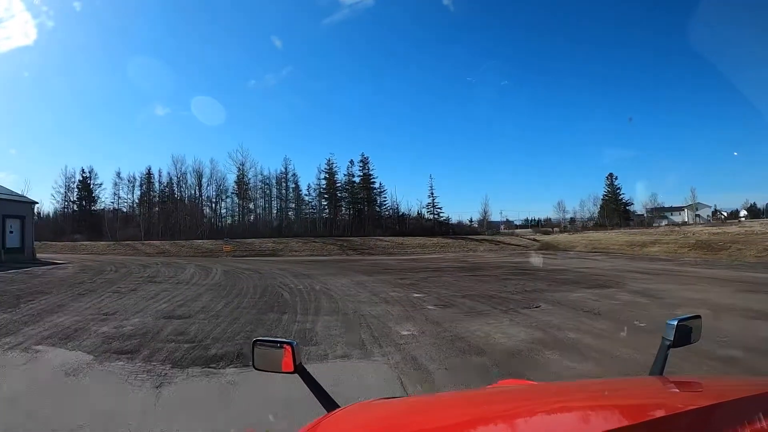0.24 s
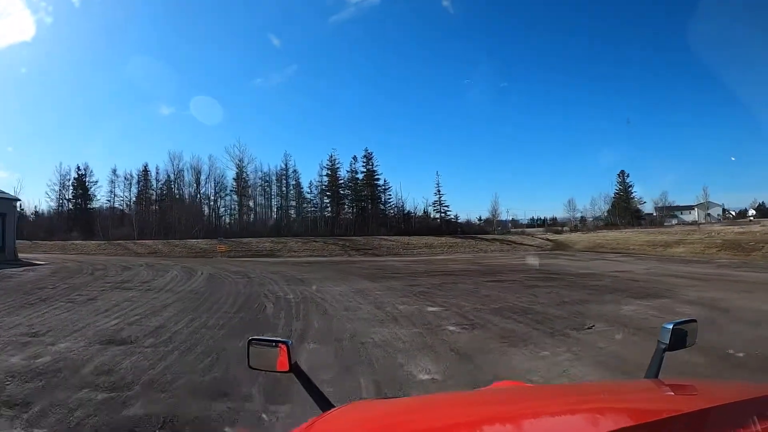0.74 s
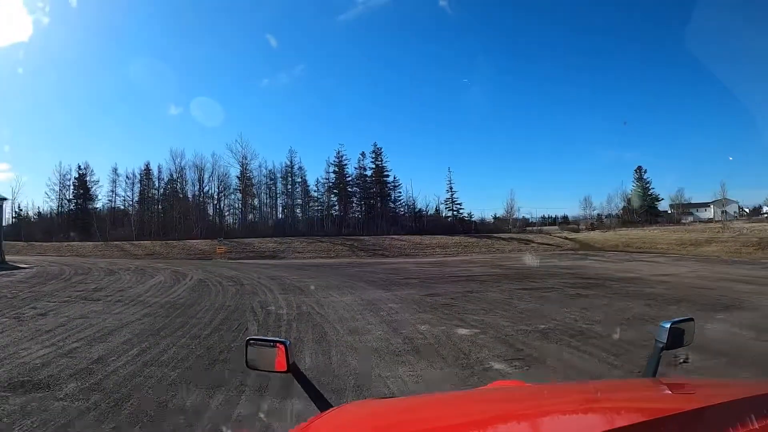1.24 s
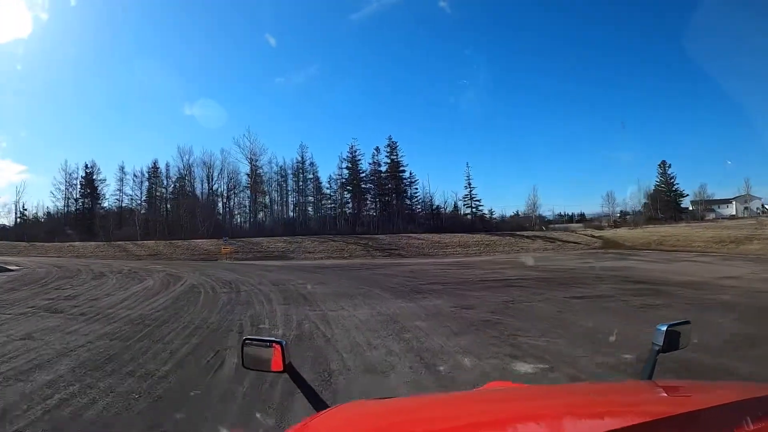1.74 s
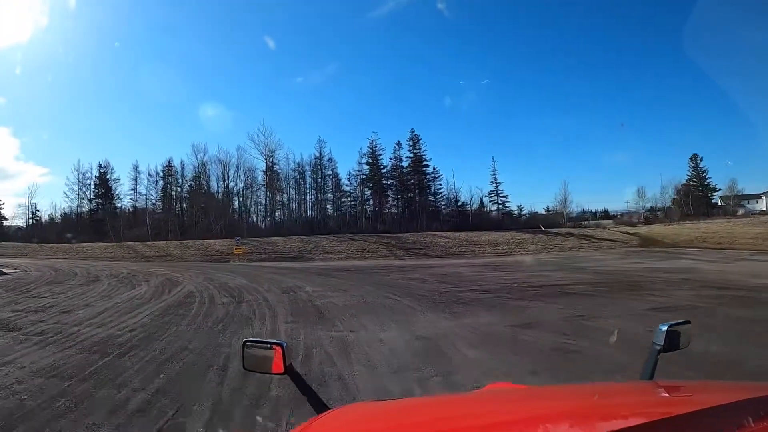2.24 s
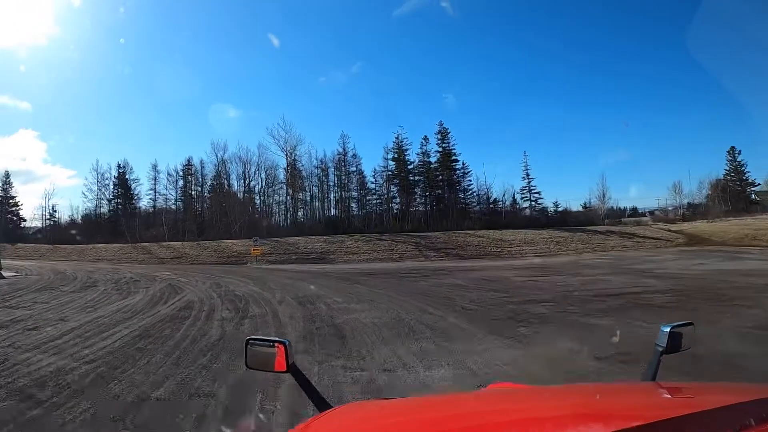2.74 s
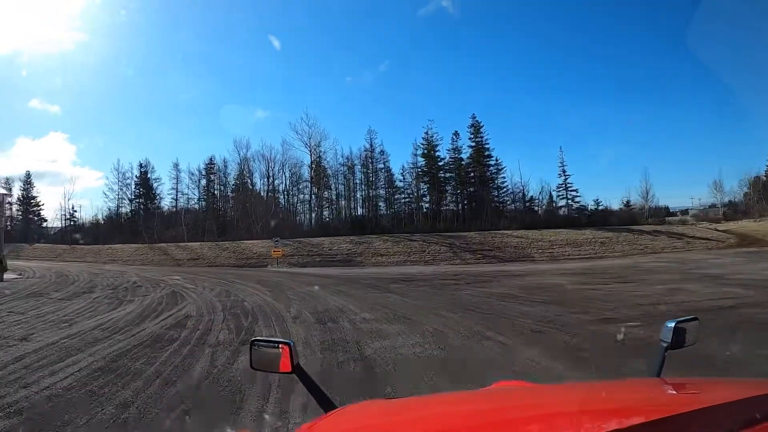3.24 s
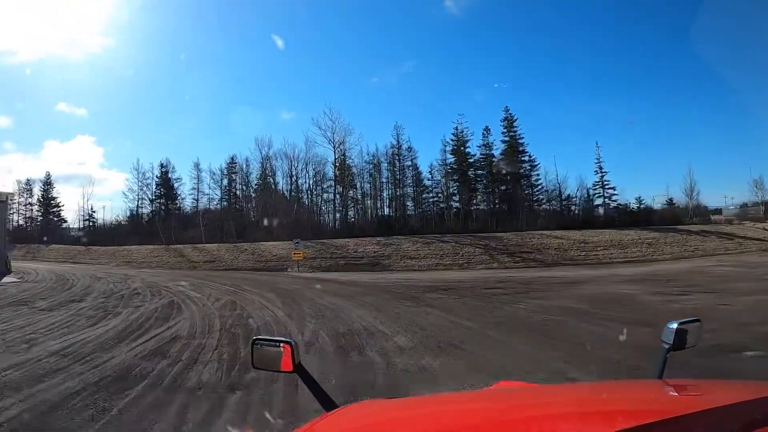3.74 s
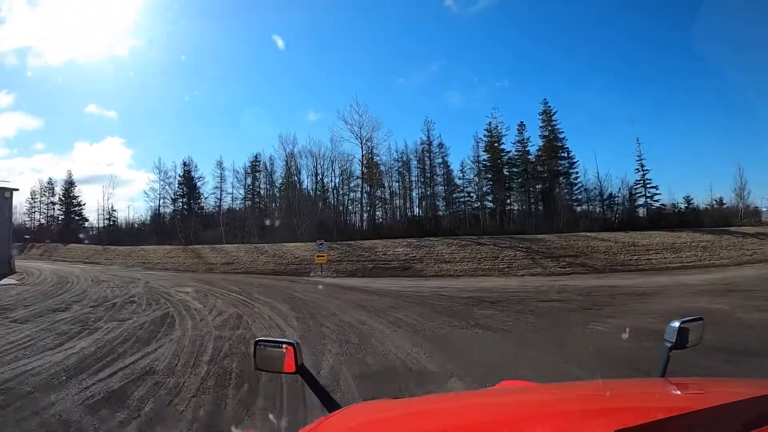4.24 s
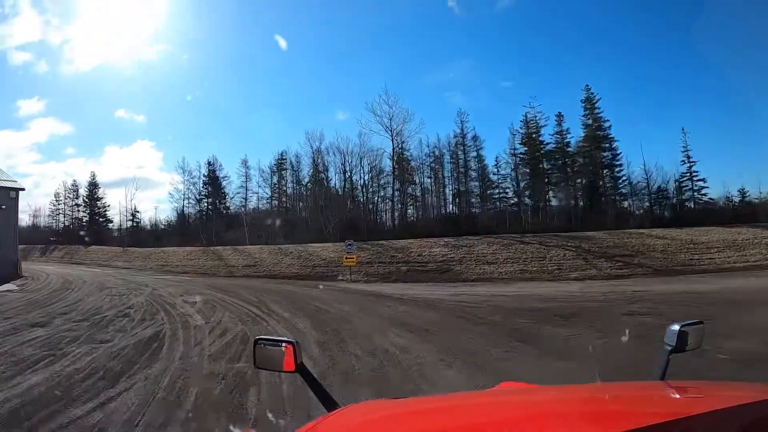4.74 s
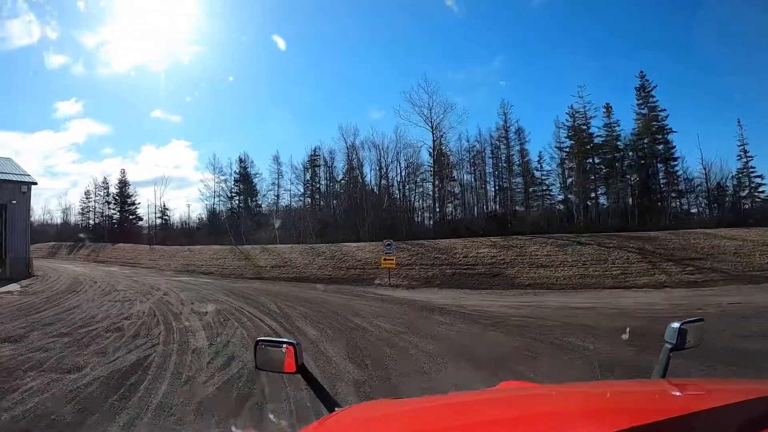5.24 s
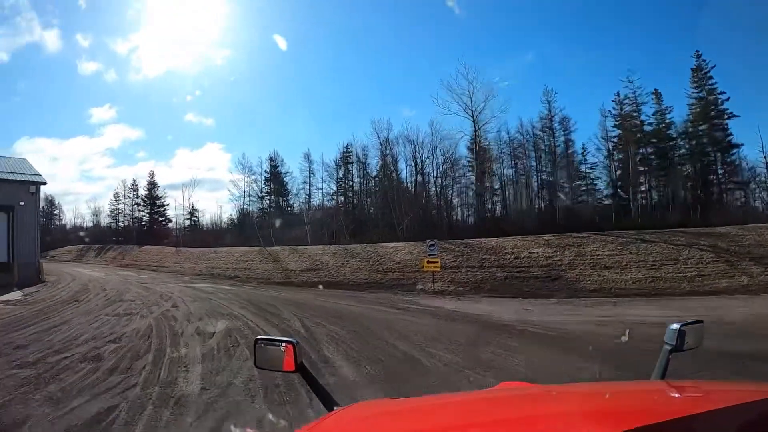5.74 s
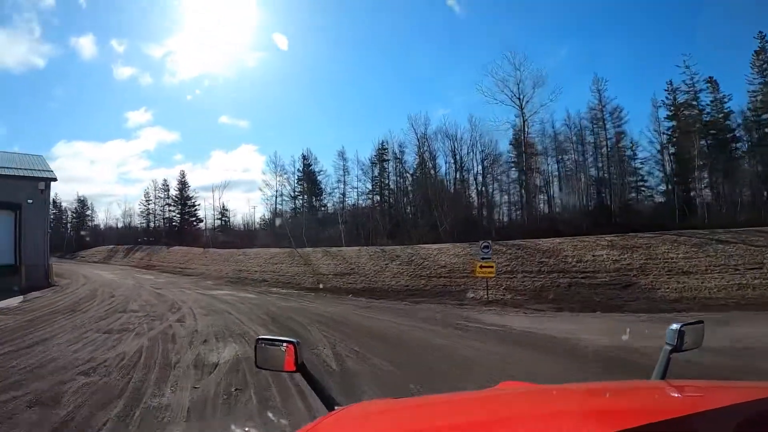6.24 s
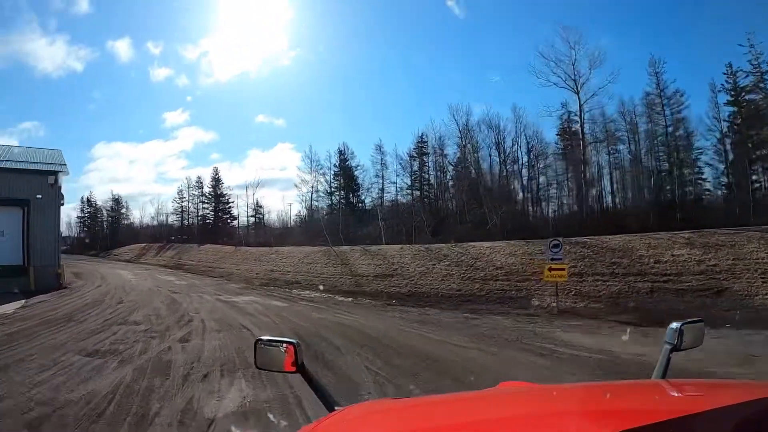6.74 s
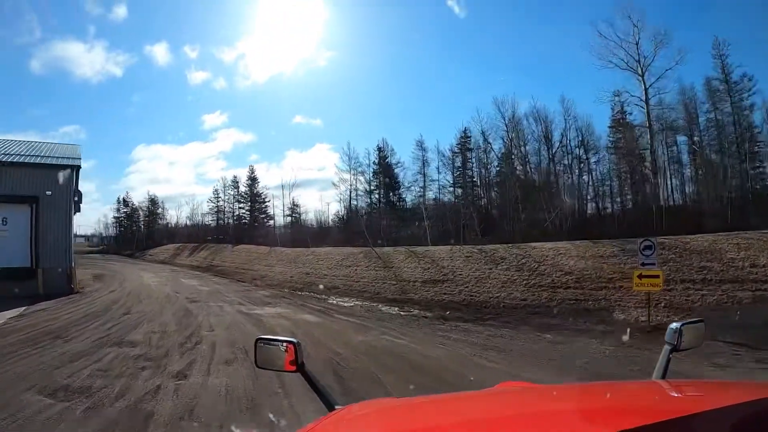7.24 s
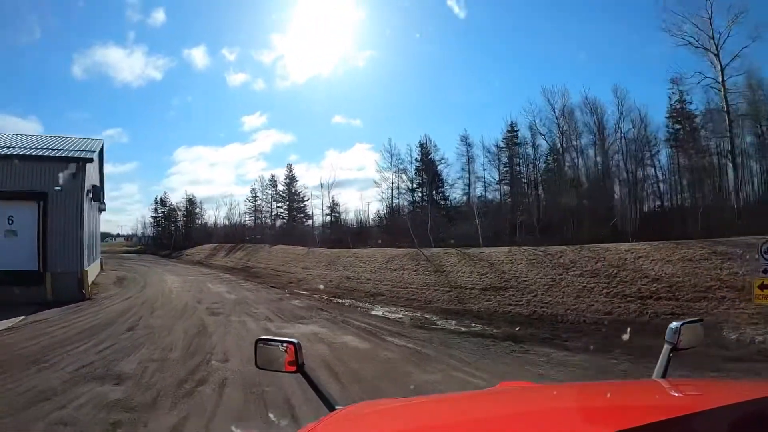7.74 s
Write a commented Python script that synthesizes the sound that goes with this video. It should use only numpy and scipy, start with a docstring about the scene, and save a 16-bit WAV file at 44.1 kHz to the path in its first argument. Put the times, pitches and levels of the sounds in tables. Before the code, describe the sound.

A stereo microphone inside a truck cab picks up a deep diesel drone, slowly falling, with faint whines and booms that swell and fade. Rough ground makes the frame shudder and thud. Plastic panels buzz in gusts and knock irregularly, with crisp cracks, ticks and light clinks. The busiest clatter comes in the first half, then bumps become sparser and the rumble eases while the engine keeps droning.

```python
"""A heavy diesel truck heard from inside its cab, rolling slowly over a dirt yard as the engine speed sinks.
Engine orders drone as sines on falling pitch curves, over a road bed of three shaped noises.
Bumps thud as short pushes into ringing frame modes. Loose trim buzzes in gusts as random contacts,
and knocks, snaps, ticks and clinks as short chatters that ring plastic and hard-part modes."""
import sys
import numpy as np
from scipy import signal
from scipy.fft import rfft, irfft
from scipy.io import wavfile
from scipy.ndimage import uniform_filter1d, minimum_filter1d

SR = 44100
rng = np.random.default_rng(int(sys.argv[2]) if len(sys.argv) > 2 else 0)


def to_wav(s):
    """Save 16-bit WAV."""
    ch = np.atleast_2d(s).T  # columns
    pcm = np.round(np.clip(ch, -1, 1) * 32767)  # PCM
    wavfile.write(sys.argv[1], SR, pcm.astype(np.int16))


N = 352800

# Engine speed and firing tone: (time [s], half the firing rate [Hz], level of the firing tone [dB])
ENGINE_CURVE = [(0, 30.42, -55), (.5, 30.25, -27), (1.1, 30.02, -47), (1.5, 29.03, -27), (2, 28.46, -28.5),
                (2.5, 27.58, -32.5), (2.9, 27.03, -25), (3.6, 26.68, -26), (4.3, 26.47, -24),
                (4.7, 26, -18.5), (5.3, 26.06, -23.5), (5.8, 25.85, -18), (6.3, 25.59, -22.5),
                (7, 25.29, -18), (7.5, 25.14, -21), (8, 24.85, -18)]
# Trim blows, levels ahead of the layer gains: (time [s], knock [dB], crack [dB], tick [dB], knock pitch [Hz])
TRIM_HITS = [(0.068, -31, -67.5, -81, 1160), (0.351, -30.5, -53, -45, 1160), (0.449, -32, -52, -42, 1340),
             (0.549, -44, -53.5, -58, 1110), (0.803, -30.5, -49, -67, 1260), (0.925, -29.5, -45, -49, 1150),
             (0.9596, -30, -42, -50, 1000), (1.4628, -27, -42, -42, 1230), (1.6485, -24.5, -48, -71, 1080),
             (1.8285, -29, -40.5, -47, 1189), (1.95, -49, -50.5, -53, 1140), (1.972, -46, -48, -48, 1140),
             (2.001, -36, -42.5, -44.5, 1090), (2.4, -39, -47.5, -61, 1900), (2.5068, -31, -56, -69, 1030),
             (2.55, -30.5, -56, -63, 1260), (2.613, -29, -56, -65, 1417), (2.666, -29, -62, -73, 1530),
             (2.715, -30, -46, -59, 1050), (2.748, -27, -50, -51, 1000), (2.7905, -31.5, -48, -60, 1020),
             (2.836, -46, -56, -60, 1900), (2.881, -31, -45.5, -56, 1200), (2.926, -27, -52, -58, 1270),
             (2.938, -23, -37, -43.5, 2000), (2.948, -21.5, -33, -40.5, 1254),
             (2.986, -24.5, -49, -54, 1300), (3.006, -25, -63, -66, 1280), (3.014, -22.5, -61, -66, 1920),
             (3.054, -50, -45, -59, 1060), (3.286, -30, -52, -64, 1230), (3.312, -37, -47, -59, 1020),
             (3.3845, -40, -45, -53, 1010), (3.409, -28, -43.5, -64, 1440), (3.458, -28, -40.5, -51, 1172),
             (3.49, -38, -47, -52, 1920), (3.565, -37, -47, -62, 1160), (3.653, -50, -45.5, -67, 1189),
             (3.748, -43, -51, -51, 1120), (3.856, -37, -42, -58, 1210), (3.887, -45, -53, -55, 1219),
             (4.064, -40, -44.5, -54, 1090), (4.1, -32, -46.5, -54, 1010), (4.157, -34, -39.5, -54, 1190),
             (4.228, -28, -46, -70, 1300), (4.324, -33, -49, -68, 1030), (4.387, -34, -48.5, -51, 1101),
             (4.524, -40, -48, -51.5, 1090), (4.59, -34, -70, -68, 1350), (4.76, -32, -62, -72, 1343),
             (4.811, -44, -52, -55.5, 1380), (5.003, -34, -51, -82, 1250), (5.073, -27.5, -47.5, -71, 1290),
             (5.216, -26, -42, -66, 1460), (5.377, -32.5, -50.5, -68, 1190),
             (5.425, -50, -46.5, -52.5, 1240), (5.875, -41, -45.5, -54, 1042),
             (5.9458, -32, -53, -63, 1930), (6.043, -36, -45.5, -61, 2050), (6.143, -37, -45, -60, 1125),
             (6.179, -35, -46, -66, 1197), (6.342, -38, -44, -52, 1030), (6.433, -33.5, -50, -76, 1310),
             (6.481, -34, -47.5, -54, 1091), (6.6593, -36, -49, -57, 1491), (6.788, -31.5, -52, -76, 1240),
             (7.22, -35, -54, -80, 1420), (7.283, -30.5, -55, -72, 1190), (7.3, -31, -42.5, -57, 1150),
             (7.42, -40, -47, -68, 1900), (7.49, -46, -50.5, -61, 1900), (7.602, -30.5, -49, -76, 1260),
             (7.634, -36, -52.5, -53, 1111), (7.757, -46, -58, -66, 1900), (7.914, -34, -55, -67, 1356)]
# Low modes of the plastic trim: (pitch [Hz], relative level [dB], 60 dB decay [s])
TRIM_MODES = [(630, -3, .035), (1000, -4, .025), (1150, -4, .028), (1285, -1, .03), (1420, -2, .035),
              (1630, -3, .035), (1925, 0, .03), (2200, -3, .03), (2450, -4, .03)]
# High modes of small hard parts: (pitch [Hz], relative level [dB], 60 dB decay [s])
HARD_MODES = [(2800, 0, .02), (3230, 0, .028), (3570, 0, .025), (3890, -1, .022), (4200, -2, .016),
              (4650, -2, .016), (5200, -3, .014), (5550, -5, .014), (5900, -4, .018), (6400, -6, .012),
              (6950, -3, .016), (8500, -9, .016)]
# Spectrum of a dry crack: (frequency [Hz], relative density [dB])
CRACK_SPECTRUM = [(1200, -27.5), (2200, 3), (3300, 6), (4000, -1), (5000, -9.5), (7000, -40.5)]
# Spectrum of a bright tick: (frequency [Hz], relative density [dB])
TICK_SPECTRUM = [(3000, -29), (4800, -1), (6000, -7), (7300, -7.5), (8500, -11), (10000, -11),
                 (12000, -37.5), (14000, -58)]


def from_db(db):
    """Decibels to gain."""
    return 10 ** (np.asarray(db) / 20)


def rms_one(x):
    """Scale to rms 1."""
    return x / np.sqrt(np.mean(x ** 2) + 1e-20)


def in_time(rows):
    """Columns of a curve, one value per sample."""
    s, *columns = np.transpose(rows)
    return [np.interp(np.arange(N) / SR, s, c) for c in columns]


def at_hz(points, hz):
    """Read a spectrum on a log-frequency axis."""
    point_hz, value = np.transpose(points)
    return np.interp(np.log(hz), np.log(point_hz), value)


def drift(rate_hz):
    """Slow random wander of rms 1: noise through a double low-pass, made at every 40th sample."""
    r = np.exp(-80 * np.pi * rate_hz / SR)
    noise = rng.standard_normal(N // 40 + 2002)
    slow = rms_one(signal.lfilter([1], [1, -2 * r, r * r], noise)[2000:])
    return np.interp(np.arange(N) / 40, np.arange(len(slow)), slow)


def ring(clicks, hz, t60):
    """Two-pole resonator: a unit click sets a dying sine of height 1 ringing."""
    r, w = from_db(-60 / (t60 * SR)), 2 * np.pi * hz / SR
    return signal.lfilter([0, np.sin(w)], [1, -2 * r * np.cos(w), r * r], clicks + 1e-18)


def tone(hz, level_db):
    """A sine of given rms level that follows a pitch curve."""
    turns = np.cumsum(hz) / SR + rng.random()
    return np.sqrt(2) * from_db(level_db) * np.sin(2 * np.pi * turns)


def band(x, low_hz, high_hz):
    """Soft band-pass."""
    return signal.sosfilt(signal.butter(2, [low_hz, high_hz], "band", fs=SR, output="sos"), x)


def colour(spectrum, mid, side):
    """Two sources become a stereo pair with this spectrum and the cab's likeness per frequency; rms 1."""
    # Likeness of left and right in the cab: (frequency [Hz], likeness [0 to 1])
    likeness = [(60, 1.0), (150, 0.97), (370, 0.97), (920, 0.85), (2280, 0.73), (5660, 0.042),
                (14000, 0.17)]
    hz = np.maximum(np.fft.rfftfreq(N, 1 / SR), 1)
    gain = from_db(at_hz(spectrum, hz))
    alike = np.clip(at_hz(likeness, hz), 0, 1)
    mid = rfft(mid) * gain * np.sqrt(1 + alike)
    side = rfft(side) * gain * np.sqrt(1 - alike)
    return rms_one(irfft([mid + side, mid - side], N))


def engine():
    """The pitched layers: engine orders, booms, whines and the hum of the cab."""
    return strong_orders() + booms_and_whines() + cycle_orders() + mount_hum() + faint_whines()


def strong_orders():
    """The firing tone, and four higher orders as loud as the cab lets through at their pitch."""
    # Cab gain for the higher orders: (pitch [Hz], mean level [dB])
    cab_gain = [(72, -40), (76, -45), (82, -33.5), (87, -35.5), (89.5, -26), (93, -21.5), (99, -24),
                (103, -25.5), (108.5, -27), (113, -45.5), (119, -31.5), (123, -39.5), (132, -34.5),
                (142, -33.5), (149, -39), (154, -42.5), (165, -48.5), (179, -53), (183, -32.5)]
    half_firing_hz, firing_db = in_time(ENGINE_CURVE)
    out = tone(2 * half_firing_hz, firing_db)
    for multiple in (3, 4, 5, 6):
        hz = multiple * half_firing_hz
        waver_db = 1.94 * drift(1.5)
        out += tone(hz, at_hz(cab_gain, hz) + waver_db)
    return out


def booms_and_whines():
    """Booms near 280 Hz and whines near 730 and 910 Hz swell and fade on sinking pitches; all waver as one."""
    # Booms, one table a swell: (time [s], pitch [Hz], mean level [dB])
    booms = [
        [(0, 284, -48), (.35, 282, -41), (.65, 279, -50), (.9, 278, -36), (1.2, 275, -36), (1.5, 269, -41),
         (1.9, 265, -50), (2.1, 263, -60)],
        [(2.1, 283, -60), (2.5, 282, -44), (3, 278, -49), (3.8, 272, -46), (4.5, 268, -52), (4.7, 266, -65)],
        [(4.7, 285, -65), (5, 284, -48), (6, 283, -50), (7, 279, -47), (8, 275, -50)],
    ]
    # Whines, one table a swell: (time [s], pitch [Hz], mean level [dB])
    swelling_whines = [
        [(0, 730, -53), (.4, 728, -57), (.6, 725, -75)],
        [(0, 914, -56), (.7, 908, -56), (1.3, 898, -72)],
        [(.6, 742, -75), (.85, 737, -53), (1.15, 729, -51), (1.4, 716, -53), (1.7, 708, -75)],
        [(2.4, 742, -75), (2.7, 735, -55), (3.2, 727, -54), (3.6, 719, -57), (4.4, 712, -59), (4.8, 708, -75)],
    ]
    return from_db(drift(1.7)) * sum(tone(*in_time(rows)) for rows in booms + swelling_whines)


def cycle_orders():
    """Every sixth of the firing rate sounds weakly, as cylinders differ."""
    # Weak orders as the cab colours them: (frequency [Hz], mean peak level [dB])
    order_levels = [(8, -35), (26, -34), (60, -36.5), (140, -41), (280, -54.5), (450, -59.5), (750, -53),
                    (1200, -75)]
    half_firing_hz, _ = in_time(ENGINE_CURVE)
    cycle_hz = half_firing_hz[::20] / 3   # made at every 20th sample
    turns, weak = np.cumsum(cycle_hz) * 20 / SR, 0
    for order in range(1, 46):
        if order not in (6, 9, 12, 15, 18):   # those are the strong orders
            level_db = at_hz(order_levels, order * cycle_hz) + 2.5 * drift(1.0)[::20]
            weak = weak + from_db(level_db) * np.sin(2 * np.pi * (order * turns + rng.random()))
    return signal.resample_poly(weak, 20, 1)[:N]


def road():
    """Three noise layers: frame shudder, rumble, and a tyre roar that throbs with each firing."""
    # Road roughness, rumble ahead of its lift: (time [s], frame shudder [dB], rumble [dB])
    roughness = [(0.0, -30.5, -46), (0.13, -29.5, -31), (1.36, -25.5, -28.5), (1.47, -24.5, -29),
                 (2.36, -23, -33), (2.69, -22.5, -30), (3.72, -26.5, -32), (3.96, -19, -30),
                 (4.43, -20, -31.5), (4.75, -42, -35.5), (5.35, -21.5, -33.5), (5.64, -34, -42),
                 (6.11, -27, -38.5), (7.08, -22.5, -42), (7.69, -26.5, -39.5), (8.0, -27.5, -45)]
    # Spectrum of the frame shudder: (frequency [Hz], relative density [dB])
    shudder_spectrum = [(5.9, -31), (10, 0), (26, 6.5), (33, 3.5), (80, -7), (100, -26), (180, -120)]
    # Spectrum of the rumble: (frequency [Hz], relative density [dB])
    rumble_spectrum = [(29, -19.5), (50, -7), (112, -5.5), (226, -18.5), (278, -20.5), (340, -32),
                       (440, -48), (750, -120)]
    # Spectrum of the tyre roar: (frequency [Hz], relative density [dB])
    roar_spectrum = [(160, -32), (280, 0), (324, -8.5), (418, -4), (532, -13), (688, -11.5), (834, -14.5),
                     (980, -13), (1690, -23), (2020, -20.5), (2450, -30), (3220, -29.5), (8700, -56.5),
                     (13000, -67.5)]
    shudder_db, rumble_db = in_time(roughness)
    rumble_db = rumble_db + 4.5 + 1.3 * drift(7.8)
    # the roar fades as the truck slows (dB per s) and swells a little with the shudder (dB per dB)
    roar_db = -38.5 - 0.3839 * np.arange(N) / SR + 0.077 * (shudder_db - shudder_db.mean())
    firing = np.cos(4 * np.pi * np.cumsum(in_time(ENGINE_CURVE)[0]) / SR)
    roar_db = roar_db + 0.5 * firing + 0.8 * drift(5.2)
    white = rng.standard_normal((6, N))
    shudder = from_db(shudder_db) * colour(shudder_spectrum, *white[:2])
    rumble = from_db(rumble_db) * colour(rumble_spectrum, *white[2:4])
    roar = from_db(roar_db) * colour(roar_spectrum, *white[4:])
    return shudder + rumble + roar


def thuds():
    """A click and a soft noisy push ring the frame at its own pitch, with a weaker mode just above."""
    # Bumps through the frame: (time [s], strike level [dB], ring pitch [Hz])
    bumps = [(0.551, -25.5, 209), (0.917, -27.5, 243), (1.381, -18, 213.5), (1.738, -22, 162),
             (1.974, -18, 196.9), (1.995, -24, 260.3), (2.022, -23, 386), (2.415, -16.5, 160),
             (2.48, -23.5, 205), (2.949, -22.5, 326), (3.382, -16, 155), (3.877, -25.5, 164),
             (4.119, -25.5, 354), (4.502, -20, 178), (5.478, -29, 368), (6.25, -14.5, 138),
             (7.228, -21.5, 163.3)]
    panel_hz, panel_octaves = 255.4, 0.21   # bumps near the panel's pitch ring longer
    frame_t60_s, panel_extra_s = 0.096, 0.38
    out = np.zeros(N)
    for s, level_db, hz in bumps:
        nearness = np.exp(-(np.log2(hz / panel_hz) / panel_octaves) ** 2)
        t60 = frame_t60_s + panel_extra_s * nearness
        push, at = np.zeros(SR // 2), round(s * SR)
        push[:300] = np.hanning(300) * rng.standard_normal(300) * 0.013
        push[0] = 1
        body = ring(push, hz, t60) + 0.14 * ring(push, 1.2 * hz, t60)
        out[at:at + SR // 2] += from_db(level_db) * body[:N - at]
    return out


def hits():
    """Each hit rings the trim modes near its own pitch, and its dry crack and tick rattle in noise."""
    s, knock_db, crack_db, tick_db, knock_hz = np.transpose(TRIM_HITS)
    length_s = 15 / knock_hz   # a knock chatters for 15 cycles of its pitch
    knock = struck((s, length_s), TRIM_MODES, knock_db - 2.5, knock_hz, far_db=45)
    # the strong upper mode answers 4 ms after the knock
    knock += struck((s + .004, length_s), TRIM_MODES[6:7], knock_db - 11.0, knock_hz, far_db=8.5)
    rattle = (s, np.full(len(s), 0.023))
    # the panel behind thumps
    body = chatters(rattle, knock_db - 21.5) * rms_one(band(rng.standard_normal(N), 450, 1300))
    white = rng.standard_normal((4, N))
    crack = chatters(rattle, crack_db + 4.0) * colour(CRACK_SPECTRUM, *white[:2])
    tick = chatters(rattle, tick_db + 3.0) * colour(TICK_SPECTRUM, *white[2:])
    return band(knock, 500, 3100) + body + ringing(crack + tick)


def snaps():
    """Sharp first contact of loose parts: a very short crack rings the trim modes, then bounces once."""
    # Snaps, levels ahead of the layer gains: (time [s], strength [dB], treble strength [dB])
    contacts = [(0.3514, -26, -41.5), (0.4497, -25, -40), (0.925, -28, -38.5), (1.4626, -26, -40),
                (1.529, -35, -61), (1.8282, -32, -49), (2.538, -31.5, -65), (2.614, -28.5, -67),
                (2.665, -30, -67), (2.9272, -28, -45), (3.2857, -34.5, -59), (3.407, -33, -61),
                (3.457, -24.5, -47), (3.924, -33, -53), (4.361, -33, -64), (4.493, -37, -53),
                (4.591, -34.5, -67), (4.766, -34, -65), (5.0756, -31, -69), (5.22, -31, -61),
                (5.9471, -33, -64), (6.026, -32, -60), (6.66, -32.5, -61), (7.222, -33.5, -73),
                (7.2829, -27.5, -65), (7.3935, -31.5, -57)]
    s, level_db, treble_db = np.transpose(contacts)
    favoured_hz = np.full(len(s), 1900)   # a snap favours the upper trim modes
    damped = [(hz, 0, t60 / 2) for hz, _, t60 in TRIM_MODES[3:] + HARD_MODES[:4]]
    white = rng.standard_normal((4, N))
    crack_noise = colour(CRACK_SPECTRUM, *white[:2])
    tick_noise = colour(TICK_SPECTRUM, *white[2:])
    out = 0
    for late_s, change_db in ((0, 0), (0.0099, -10.5)):   # the snap, then its bounce
        table = (s + late_s - .001, np.full(len(s), 0.0082))
        snap_db, bright_db = level_db + change_db, treble_db + change_db
        out = out + struck(table, damped, snap_db - 13.0, favoured_hz, far_db=5.0)
        out = out + chatters(table, snap_db - 8.5) * crack_noise
        # the brightest snaps also knock the lowest mode
        out = out + struck(table, TRIM_MODES[:1], bright_db + 12.5, favoured_hz, far_db=0.5)
        out = out + chatters(table, bright_db) * tick_noise
    return out


def clinks():
    """Each clink of small hard parts rings the high modes near its pitch."""
    # Clinks, levels ahead of the layer gain: (time [s], strength [dB], pitch [Hz], chatter length [s])
    contacts = [(0.548, -48.5, 6200, 0.03), (0.656, -50.5, 6200, 0.033), (0.806, -49, 3660, 0.013),
                (0.923, -50, 4700, .015), (0.962, -58, 3300, 0.015), (0.968, -43, 3300, 0.018),
                (0.981, -41.5, 6146, 0.085), (1.824, -49, 3230, .02), (1.994, -49, 3700, .03),
                (2.364, -44.5, 4200, 0.18), (2.572, -48, 3460, 0.016), (2.617, -45.5, 3800, 0.016),
                (2.743, -44.5, 2780, 0.014), (3.01, -42, 3660, 0.027), (3.31, -51, 4600, .02),
                (3.451, -46, 3230, .02), (4.398, -43, 5086, 0.066), (4.476, -55, 4800, 0.018),
                (4.54, -48, 5604, 0.056), (4.631, -57, 5234, 0.035), (5.907, -54, 3230, .015),
                (5.985, -52, 5585, 0.047), (6.218, -46.5, 5230, 0.094), (7.288, -49, 4200, 0.041),
                (7.334, -54, 4300, .025)]
    s, level_db, hz, length_s = np.transpose(contacts)
    return band(struck((s, length_s), HARD_MODES, level_db + 6.0, hz, far_db=35.0), 1900, 8500)


def chatters(table, level_db, shape=1):
    """Dying chatters laid out in time; long ones build up more slowly."""
    s, length_s = table
    passed = np.arange(4000) / SR / np.maximum(length_s, .002)[:, None]   # in chatter lengths
    envelope = np.exp(-3.0 * passed) * (1 - np.exp(-passed / 0.09))
    at = (s * SR).astype(int)[:, None] + np.arange(4000)
    out = np.zeros(N + 4000)
    np.add.at(out, at, shape * envelope * from_db(level_db)[:, None])
    return out[:N]


def struck(table, modes, blow_db, own_hz, far_db):
    """A clean push in step with each mode and a noisy chatter ring modes that lose far_db per octave off pitch."""
    firmness, contact_s = 3.5, .006   # strength of the clean push against the chatter, and its length
    rough = rng.standard_normal((len(own_hz), 4000)) / np.sqrt(table[1] * SR / 6)[:, None]
    t = np.arange(4000) / SR
    push = firmness * 4 / (contact_s * SR) * np.sin(np.pi * np.minimum(t / contact_s, 1)) ** 2
    out = 0
    for hz, level_db, t60 in modes:
        mode_db = blow_db + level_db - far_db * abs(np.log2(hz / own_hz))
        drive = rough + push * np.sin(2 * np.pi * hz * t)
        out = out + ring(chatters(table, mode_db, drive), hz, t60)
    return out


def ringing(x):
    """A burst of noise stays partly dry and sets the upper trim modes and the small parts ringing."""
    rung = 0
    for k, (hz, _, t60) in enumerate(TRIM_MODES[6:] + HARD_MODES):
        evening = 2 * (1 - from_db(-60 / (t60 * SR)))   # offsets the resonator's gain
        rung = rung + (-1) ** k * ring(x, hz, t60) * evening
    return from_db(-8) * x + from_db(4.5) * rung


def buzz():
    """Loose trim makes dense small contacts while the cab shakes; part of them ring the trim modes."""
    # How hard the cab shakes: (time [s], shaking [dB])
    shaking = [(0, -51), (.3, -48.5), (.55, -49), (.9, -45), (1.2, -48.5), (1.7, -48), (1.97, -45.5),
               (2.2, -56), (2.5, -42), (2.9, -48.5), (3.24, -47), (3.6, -50), (4.2, -44.5), (4.45, -42),
               (4.9, -50), (5.66, -48), (6, -49), (7.1, -51), (8, -49)]
    # Spectrum of the dull buzz: (frequency [Hz], relative density [dB])
    dull_spectrum = [(350, -25.5), (600, 5.5), (776, -9), (1280, -1.5), (1710, -4.5), (1900, -4),
                     (2190, -6.5), (3300, -8.5), (5000, -30.5), (6500, -61.5), (11000, -120)]
    # Spectrum of the bright buzz: (frequency [Hz], relative density [dB])
    bright_spectrum = [(1470, -33.5), (2500, -2), (3320, -11.5), (4140, -4.5), (4750, -8.5), (7800, -21),
                       (8650, -18.5), (13000, -42)]
    shake_db, = in_time(shaking)
    mean_db = shake_db.mean()
    bright_db = mean_db - 16.5 + 1.3 * (shake_db - mean_db)   # swings more than the dull one
    crack_db = np.transpose(TRIM_HITS)[2]
    dull_gain = from_db(shake_db) + stir(crack_db - 2.5)
    bright_gain = from_db(bright_db) + stir(crack_db - 10.5)
    dull = from_db(-5.0) * colour(dull_spectrum, *grains(3000, 4.3))
    dull = dull + from_db(-16.0) * band(taps(TRIM_MODES, 200), 780, 2000)
    bright = from_db(-0.5) * colour(bright_spectrum, *grains(3500, 3.0))
    bright = bright + from_db(-5.5) * band(taps(HARD_MODES, 150), 2300, 8000)
    return dull_gain * dull + bright_gain * bright


def stir(level_db):
    """The shaking around each hit: a quick rise and a dying tail, as gain."""
    rise_s, t60_s = 0.018, 0.26
    kicks, r = np.zeros(N), from_db(-60 / (t60_s * SR))
    kicks[(np.transpose(TRIM_HITS)[0] * SR).astype(int)] = from_db(level_db)
    tails = signal.lfilter([1], [1, -r], kicks + 1e-18)
    return uniform_filter1d(tails, int(rise_s * SR))


def grains(per_s, spread_db):
    """Two trains of random contacts of uneven size, bunched in time."""
    born = rng.random((2, N)) < per_s * from_db(4.5 * drift(15)) / SR
    size = from_db(spread_db * np.minimum(rng.exponential(1, (2, N)), 4))
    return born * size * rng.choice([-1, 1], (2, N))


def taps(modes, per_s):
    """Stray contacts dealt at random to the modes; rms 1."""
    contacts, dealt = grains(per_s, 3.2)[0], rng.integers(0, len(modes), N)
    out = 0
    for k, (hz, level_db, t60) in enumerate(modes):
        out = out + from_db(level_db) * ring(contacts * (dealt == k), hz, t60)
    return rms_one(out)


def moan():
    """A low moan of the cab over the rough ground: a gliding sine that fades in and out at its ends."""
    # Cab moan: (time [s], pitch [Hz], level [dB])
    curve = [(1.2, 47, -38), (1.5, 45, -25), (1.8, 50, -26), (2.05, 48, -40), (2.4, 45, -23),
             (2.75, 43, -36), (3.05, 50, -25), (3.4, 49, -40)]
    t, first, last = np.arange(N) / SR, curve[0][0], curve[-1][0]
    return tone(*in_time(curve)) * np.clip(np.minimum(t - first, last - t) * 10, 0, 1)


def mount_hum():
    """A low hum of the cab on its mounts, strongest at the start: a sine wandering in pitch and level."""
    # Hum on the mounts: (time [s], pitch [Hz], level [dB])
    curve = [(0, 27.05, -28.5), (1.1, 24.85, -44.5), (1.6, 24, -37), (2.1, 24.61, -40), (3, 28.2, -39.5),
             (4, 25.1, -45.5)]
    return tone(*in_time(curve))


def faint_whines():
    """Faint whines of fan and pumps: noise through narrow resonators."""
    # Whines: (pitch [Hz], width [Hz], level at the start [dB], level at the end [dB])
    resonances = [(595, 3.1, -64, -62.5), (676, 4, -63, -55.5)]
    out = 0
    for hz, width_hz, start_db, end_db in resonances:
        narrow = rms_one(ring(rng.standard_normal(N), hz, np.log(1000) / np.pi / width_hz))
        out = out + from_db(np.linspace(start_db, end_db, N)) * narrow
    return out


def cab(x):
    """The small padded cab: a short burst of dying reflections, other ones at each side."""
    t = np.arange(SR // 5) / SR
    t60_s = 0.05
    echoes = rng.standard_normal((2, len(t))) * from_db(-60 * t / t60_s) * (t > .002)
    echoes /= np.sqrt(np.sum(echoes ** 2, axis=1, keepdims=True))
    return signal.fftconvolve(x, echoes, axes=1)[:, :N]


def scene():
    """Engine, moan and thuds fill the cab alike on both sides; the trim sounds close by with cab echoes."""
    trim = hits() + snaps() + clinks()
    return engine() + road() + thuds() + trim + from_db(-4.5) * cab(trim) + buzz() + moan()


def record(dry):
    """Two microphone ports differ in level and phase by frequency; a limiter holds the peaks, the top is cut."""
    # Level of left over right: (frequency [Hz], difference [dB])
    tilt = [(60, 1), (400, 1), (700, .3), (1240, 1), (2280, -1.5), (4200, -.5), (7700, 3), (14000, 1)]
    # Phase by which left leads right: (frequency [Hz], lead [rad])
    lead = [(0, 0), (690, -.2), (2400, .9), (4700, 1.1), (7200, 3.4), (10000, 2.6), (12000, 0)]
    limit, cutoff_hz = .385, 14600
    dry = np.pad(dry, ((0, 0), (3600, 3600)), "reflect")   # run-in for the filters
    hz = np.maximum(np.fft.rfftfreq(N + 7200, 1 / SR), 1)
    # each port takes half the difference
    half = from_db(at_hz(tilt, hz) / 2) * np.exp(.5j * np.interp(hz, *np.transpose(lead)))
    ports = irfft(rfft(dry) * [half, 1 / half], N + 7200)
    peak = -minimum_filter1d(-abs(ports).max(axis=0), 2001)   # the limiter looks ahead and eases the gain
    ports = ports * uniform_filter1d(np.minimum(1, limit / peak), 2001)
    low_pass = signal.cheby2(12, 70, cutoff_hz, fs=SR, output="sos")
    return signal.sosfilt(low_pass, ports)[:, 3600:N + 3600]


dry = scene()
out = record(dry)
to_wav(out)
```